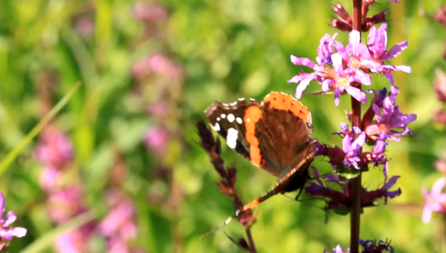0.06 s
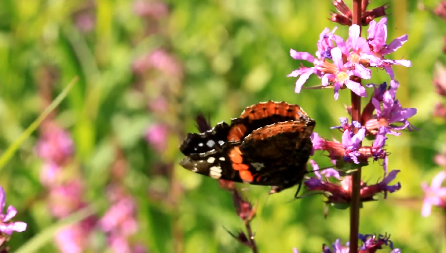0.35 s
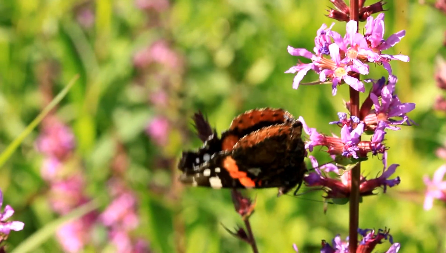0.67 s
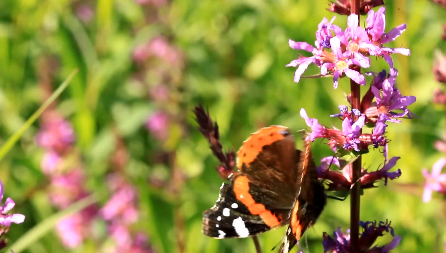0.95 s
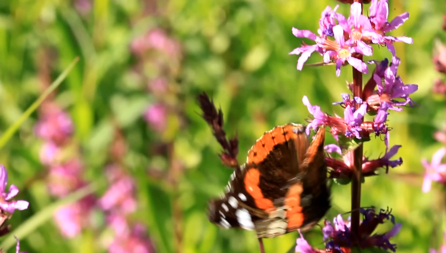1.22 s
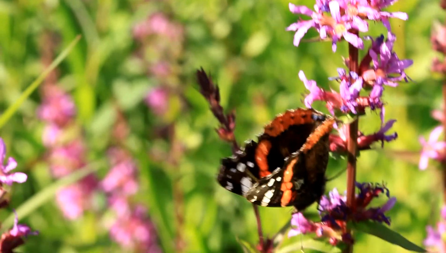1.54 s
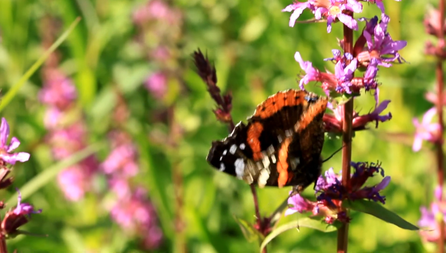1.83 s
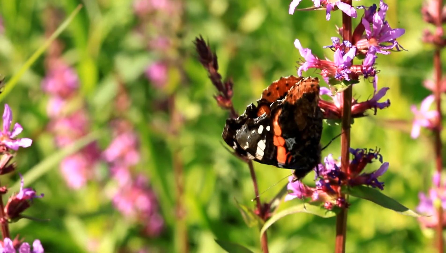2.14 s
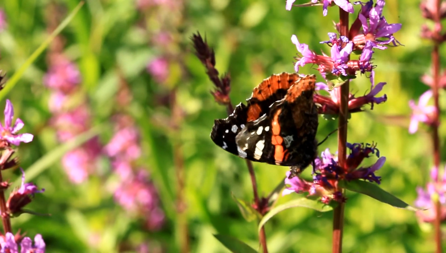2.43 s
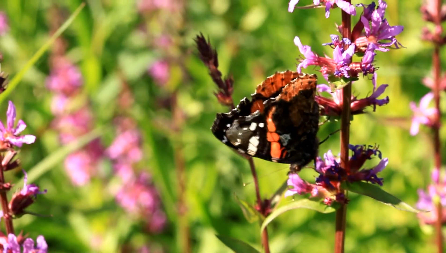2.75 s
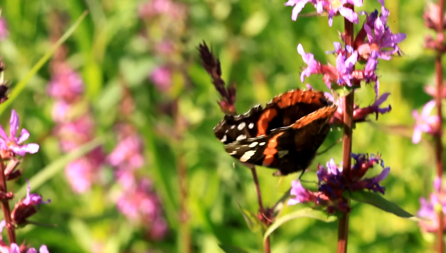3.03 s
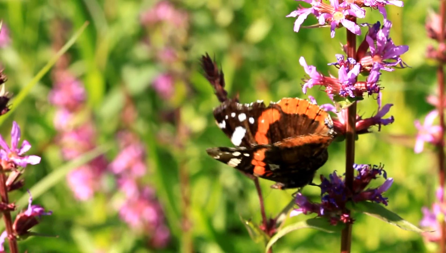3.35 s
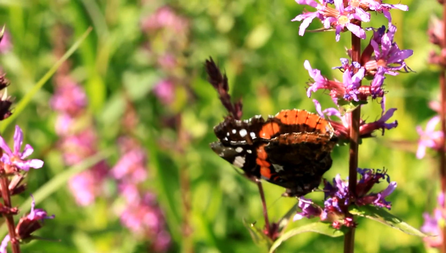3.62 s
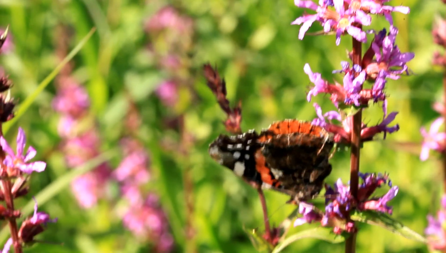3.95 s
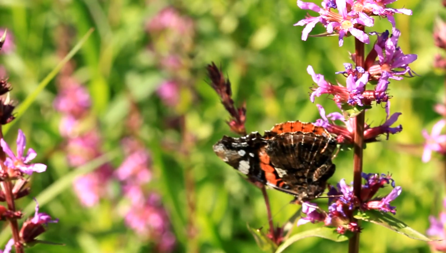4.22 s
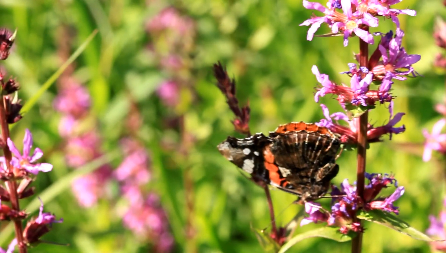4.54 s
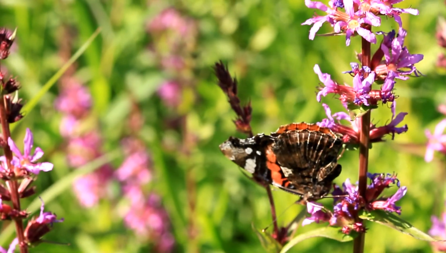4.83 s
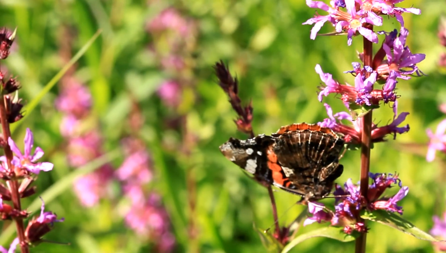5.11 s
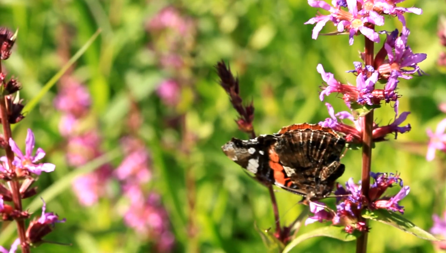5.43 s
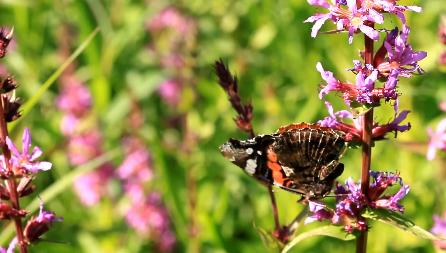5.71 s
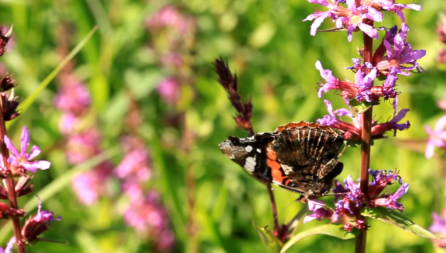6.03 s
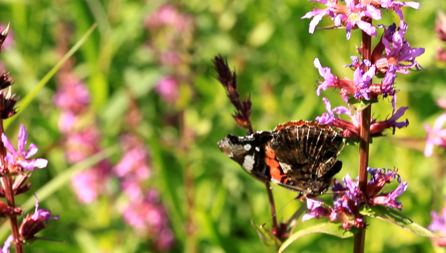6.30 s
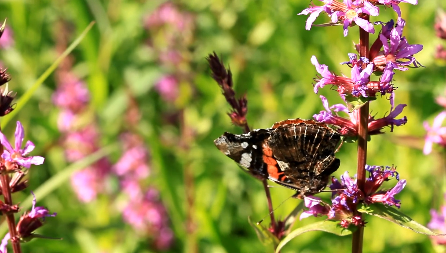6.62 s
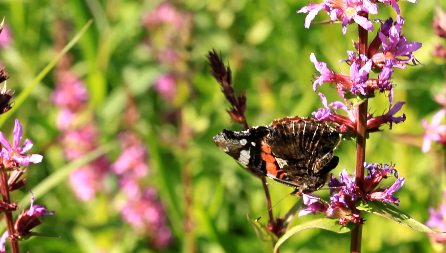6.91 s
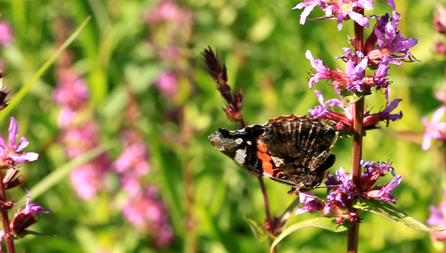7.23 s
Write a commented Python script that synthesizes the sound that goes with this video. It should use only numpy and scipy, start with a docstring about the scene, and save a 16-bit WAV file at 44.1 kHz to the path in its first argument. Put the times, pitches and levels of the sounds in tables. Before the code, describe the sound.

A small bird gives a short, high, rising whistle about once a second over the soft distant wash of a summer meadow and a very faint insect hum. Near the start, the camera body clicks sharply three times, right at the microphone, the third by far the loudest. A few soft far knocks and faint high ticks are scattered beneath, and from halfway on light wind rumbles on the microphone.

```python
"""Over the distant wash of a summer meadow and an insect's hum, a small bird repeats a rising whistle
about once a second: a nearly pure tone, reflected by the ground and scattered by plants and trees.
The camera that listens clicks sharply three times as its body is struck into resonance, the last so
loudly that its limiter ducks the meadow. Beneath are a few soft far knocks, faint ticks, one far
rising note and, from halfway on, light wind rumbling on the microphone."""
import sys
import numpy as np
from scipy import signal
from scipy.fft import rfft, irfft
from scipy.io import wavfile

SR = 44100
rng = np.random.default_rng(int(sys.argv[2]) if len(sys.argv) > 2 else 0)


def to_wav(sig):
    """Store sig (one row per channel, or 1-D mono) as 16-bit WAV at the path in sys.argv[1].

    Samples outside -1..1 are clipped; the rate is SR.
    """
    pcm = np.clip(np.atleast_2d(sig), -1, 1) * 32767
    pcm = np.round(pcm).astype(np.int16)
    wavfile.write(sys.argv[1], SR, pcm.T)  # frames by channels


N = 324576
TIME = np.arange(N) / SR

# Spectral densities of the distant wash and the even hiss: frequency_hz, relative_db
WASH_SPECTRUM = [(15, -43), (25, -12.5), (43, -6), (114, -9.5), (195, -3), (228, -3.5), (359, -1),
                 (589, -4.5), (676, -5), (746, -4.5), (856, -3.5), (1520, -4), (2800, -12.5), (3640, -25.5),
                 (6160, -120)]
HISS_SPECTRUM = [(1500, -30), (2500, -3), (3000, -0.5), (4300, 0), (6000, -2), (7500, -2), (8600, -8),
                 (10000, -12.5), (12000, -16.5), (15500, -21)]
# Slow drift of the wash: time_s, gain_db
WASH_DRIFT = [(0, -3), (.7, -1.88), (1.5, 0), (2.3, -1.78), (3.3, -0.54), (4.2, -1.5), (5.5, -0.88),
              (6.6, -0.93), (7.36, -1)]
# A moment in which the wash wavers and the hiss dips: time_s, wash_gain_db, hiss_gain_db
MEADOW_DIP = [(.803, 5.5, -0.5), (.812, 0.5, -15), (.826, -5.5, -12), (.836, -1, -8), (.855, 0.5, -3.5),
              (0.873, 3.5, 0)]
# Brief low swells of the wash: centre_s, length_s, frequency_hz, level_db
WASH_SWELLS = [(2.3, .7, 240, -59), (4.861, 0.285, 229.8, -51)]
# The bird's whistles: start_s, length_s, first_hz, drift_hz, hold_s, shoulder_hz, slur_at_s, slur_s,
# easing (1 = straight), top_hz, base_db, accent_db, accent_at_s, octave_db; "at" counts from start_s
BIRD_WHISTLES = [(0.081, 0.156, 3054, 10.5, 0.0507, 3413, 0.1105, .046, 1.8, 4745, -39.5, 4.33, 0.137, -61),
                 (1.004, 0.1672, 3039, 59.5, 0.045, 3465, .095, .060, 1.1, 4885, -39, 1.4, 0.13, -62),
                 (1.889, 0.1602, 2983, 200, 0.0466, 3430, 0.0999, 0.0617, 1.165, 4753, -39.5, 5.75, 0.1327, -53),
                 (2.826, 0.1674, 2990, 50, 0.042, 3390, 0.0968, 0.0662, 1.49, 4781, -39, 9, 0.1336, -52.5),
                 (3.760, 0.1644, 3027, 220, 0.0446, 3499, 0.0841, 0.0655, 1.07, 5234, -38, 5.75, 0.1126, -48.5),
                 (4.688, 0.1798, 2906, -71, .037, 3393, 0.1067, .054, 1.3, 4858, -40.5, 8.4, 0.134, -57),
                 (5.731, 0.166, 3004, 221, 0.0412, 3451, .099, .045, 0.9, 5215, -38, 7.24, 0.1355, -50.5),
                 (6.763, 0.1785, 2999, 87.5, 0.0371, 3323, 0.1007, 0.0692, 1.36, 4723, -41.5, 8.7, 0.1387, -58.5)]
# Scattering strength of the foliage: frequency_hz, gain_db
FOLIAGE_SCATTER = [(2000, -1.5), (3000, 0), (4200, 1), (4800, 2), (5250, -1.5), (10000, -7.5)]
# Soft far knocks: start_s, level_db, pitch_hz, t60_s
FAR_KNOCKS = [(.169, -32.5, 1740, 0.029), (2.1016, -30.5, 2124, 0.0165), (2.5575, -23.5, 550, 0.011),
              (2.5585, -38, 1608, .06), (4.605, -36, 1812, 0.039), (6.654, -37, 1738, 0.037),
              (7.05, -26.5, 1522, 0.029), (7.058, -38.5, 305, .15)]
# The camera's clicks: start_s, strike_db, gap_s, second_relative_db, snap_relative_db, push_db
CAMERA_CLICKS = [(0.5822, -12.5, 0.000826, 3.5, -9.5, -43), (0.9445, -12.5, 0.00081, -11, -5.5, -51),
                 (1.0653, -2, 0.00055, -10.5, -20.5, -28)]
# Normal modes of the camera body: frequency_hz, relative_db, t60_s
BODY_MODES = [(1123, -22.5, 0.0304), (1421.5, -15.5, 0.0318), (1984, -17.5, 0.0255), (2337, -21, 0.011),
              (3426, -15.5, 0.0059), (3938, -12, 0.0122), (5480, -8.5, 0.0099), (6120, -5, 0.0098),
              (6717, -7.5, 0.0199), (7273, -8.5, 0.01165), (8060, -6.5, 0.0092), (9700, -8, 0.00388),
              (11280, -17, 0.00464)]
# Spectrum of the snap that starts a click: frequency_hz, relative_db
SNAP_SPECTRUM = [(200, -22.5), (1500, -1), (4000, -5), (6500, -2), (8200, 5), (10000, -18.5), (12500, -13),
                 (16000, -33.5)]
# Faint high ticks: start_s, relative_db, centre_hz
HIGH_TICKS = [(0.7527, -43.5, 6150), (1.0246, -38, 6230), (1.507, -38, 6650), (2.1001, -39, 7100),
              (2.3431, -39.5, 6860), (2.5935, -37.5, 6250), (3.3812, -41.5, 5730), (4.3685, -42, 7450),
              (5.5528, -38, 6620), (7.2714, -41, 5500)]
# Spectral densities of the wind's rumble and a strong gust's flutter: frequency_hz, relative_db
RUMBLE_SPECTRUM = [(12, -24.5), (28, -3.5), (52, -7), (80, -4.5), (120, -12.5), (170, -21.5), (260, -34.5),
                   (600, -73)]
FLUTTER_SPECTRUM = [(40, -22), (100, -8.5), (140, 4.5), (190, -4), (300, -27), (700, -70)]
# Gusts on the microphone: peak_s, rise_and_fall_s, relative_db
WIND_GUSTS = [(4.365, 0.04, -43), (4.545, 0.037, -44), (5.115, 0.03, -49), (6.385, 0.032, -47),
              (6.505, 0.0375, -35.5), (7.23, 0.027, -49)]


def gain_of(db):
    """Amplitude ratio: tenfold for every 20 dB."""
    return 10 ** (np.asarray(db) / 20)


def unit_rms(x):
    """Normalisation to a mean power of 1."""
    return x / np.sqrt(np.mean(x ** 2) + 1e-20)


def add(mix, start_s, sound):
    """Superposition: a sound joins the mix at start_s."""
    part = mix[round(start_s * SR):][:len(sound)]
    part += sound[:len(part)]


def coloured(x, spectrum):
    """Zero-phase filtering by a curve of frequency_hz, gain_db."""
    hz, db = np.transpose(spectrum)
    curve_db = np.interp(np.log(np.fft.rfftfreq(len(x), 1 / SR) + 1), np.log(hz + 1), db)
    return irfft(rfft(x) * gain_of(curve_db), len(x))


def noise(spectrum, size):
    """Spectral shaping of white noise, scaled to rms 1."""
    return unit_rms(coloured(rng.standard_normal(size), spectrum))


def wander(rate_hz, size):
    """Low-passed noise: a smooth random fluctuation of rms 1, up to about rate_hz."""
    low_pass = np.exp(-(np.fft.rfftfreq(size, 1 / SR) / rate_hz) ** 2)
    low_pass[0] = 0
    return unit_rms(irfft(rfft(rng.standard_normal(size)) * low_pass, size))


def decay(t, t60_s):
    """Exponential damping: the amplitude falls 60 dB in t60_s."""
    return np.exp(-np.log(1000) * t / t60_s)


def meadow(wash_db=-49, hiss_db=-52.5, sway_db=0.5, flicker_db=1.0):
    """Amplitude-modulated noise: a low wash drifts and swells in narrow bands under an even hiss."""
    dip_s, wash_dip_db, hiss_dip_db = np.transpose(MEADOW_DIP)
    drift_db = np.interp(TIME, *np.transpose(WASH_DRIFT))
    drift_db += sway_db * wander(0.99, N) + flicker_db * wander(30.9, N)
    wash = noise(WASH_SPECTRUM, N) * gain_of(wash_db + drift_db + np.interp(TIME, dip_s, wash_dip_db))
    hiss = noise(HISS_SPECTRUM, N)
    hiss *= gain_of(hiss_db + 0.3 * wander(14.5, N) + np.interp(TIME, dip_s, hiss_dip_db))
    for centre_s, length_s, hz, db in WASH_SWELLS:
        band = [(hz / 2, -40), (hz * 0.855, -3), (hz, 0), (hz * 1.165, -4), (hz * 2, -50), (hz * 10, -90)]
        wash += gain_of(db) * noise(band, N) * np.exp(-(2 * (TIME - centre_s) / length_s) ** 2)
    return wash + hiss


def insect(wingbeat_hz=200, level_db=-64, waver=.04, swell_db=3):
    """Periodic wingbeats radiate a fundamental and its octave; pitch and level wander in flight."""
    phase = 2 * np.pi * np.cumsum(wingbeat_hz * (1 + waver * wander(4.06, N))) / SR
    hum = np.sin(phase) + gain_of(-0.5) * np.sin(2 * phase)
    return gain_of(level_db) * unit_rms(hum * gain_of(swell_db * wander(1.93, N)))


def whistle(length_s, first_hz, drift_hz, hold_s, shoulder_hz, slur_at_s, slur_s, easing, top_hz,
            base_db, accent_db, accent_at_s, octave_db,
            scoop_hz=109.7, scoop_s=0.0072, step_s=.028, shoulder_hz_per_s=7500, waver=0.00505,
            crescendo_db=8, step_dip_db=2, accent_s=0.02075, flutter_db=1.71,
            attack_s=0.0151, release_s=0.0075, octave_s=0.0453, thin_octave_db=-41):
    """Frequency modulation: a nearly pure tone scoops, holds, steps up, then slurs upward and swells."""
    t = np.arange(0, length_s, 1 / SR)
    held_hz = first_hz + drift_hz * np.minimum(t / hold_s, 1) - scoop_hz * np.exp(-t / scoop_s)
    rising_hz = shoulder_hz + shoulder_hz_per_s * np.maximum(np.minimum(t, slur_at_s) - hold_s - step_s, 0)
    step = np.clip((t - hold_s) / step_s, 0, 1)
    slur = 1 - np.clip(1 - (t - slur_at_s) / slur_s, 0, 1) ** easing
    pitch_hz = held_hz + step * (rising_hz - held_hz) + slur * (top_hz - rising_hz)
    phase = 2 * np.pi * np.cumsum(pitch_hz * (1 + waver * wander(123, len(t)))) / SR
    swell_db = crescendo_db * t / length_s + accent_db * np.exp(-((t - accent_at_s) / accent_s) ** 2)
    dip_db = step_dip_db * np.exp(-(2 * (t - hold_s) / step_s) ** 2)
    fundamental = gain_of(base_db + swell_db - dip_db + flutter_db * wander(162, len(t)))
    opening = np.exp(-(t / octave_s) ** 4)  # the tone turns pure once the throat is tuned to it
    octave = gain_of(octave_db) * opening + gain_of(thin_octave_db) * fundamental
    gate = np.minimum(t / attack_s, 1) * np.minimum((length_s - t) / release_s, 1)
    return np.sqrt(2) * gate * (fundamental * np.sin(phase) + octave * np.sin(2 * phase))


def foliage(x, near_db=-8.0, near_t60_s=0.175, far_db=-13, far_t60_s=0.387, echo_s=0.061, echo_db=-19):
    """Scattering: near stems add a short tail to the direct sound, far trees a long one; one echo."""
    t = np.arange(SR * 2 // 3) / SR
    response = np.zeros(len(t))
    for db, t60_s, onset_s in [(near_db, near_t60_s, .002), (far_db, far_t60_s, .018)]:
        tail = rng.standard_normal(len(t)) * decay(t, t60_s) * (1 - np.exp(-(t / onset_s) ** 2))
        response += gain_of(db) * tail / np.linalg.norm(tail)
    add(response, echo_s, gain_of([echo_db]))
    return signal.fftconvolve(x, signal.unit_impulse(len(t)) + coloured(response, FOLIAGE_SCATTER))


def bird(ground_delay_s=.00301, ground_db=-14):
    """Interference: the ground reflection, just behind the direct sound, ripples each slur."""
    song = np.zeros(N)
    for start_s, *shape in BIRD_WHISTLES:
        add(song, start_s, foliage(whistle(*shape)))  # bird and leaves move, so each scatters anew
    delay = np.exp(-2j * np.pi * np.fft.rfftfreq(N, 1 / SR) * ground_delay_s)
    return song + gain_of(ground_db) * irfft(rfft(song) * delay, N)


def knocks(rise_s=0.000405):
    """Damped resonance: one mode of each far knock arrives through the foliage."""
    out, t = np.zeros(N), np.arange(SR // 4) / SR
    for start_s, db, hz, t60_s in FAR_KNOCKS:
        envelope = decay(t, t60_s) * (1 - np.exp(-t / rise_s))
        add(out, start_s, gain_of(db) * np.sin(2 * np.pi * hz * t) * envelope)
    return foliage(out, far_db=-9)[:N]


def camera_clicks(snap_t60_s=0.0167, push_hz=105, push_t60_s=0.0434, thud_db=-29, thud_t60_s=0.0226):
    """Impact excitation: a double strike rings the plastic body's modes, with a thud and a low push."""
    out, t = np.zeros(N), np.arange(SR // 10) / SR
    ring = sum((-1) ** k * gain_of(db) * decay(t, t60_s) * np.sin(2 * np.pi * hz * t)
               for k, (hz, db, t60_s) in enumerate(BODY_MODES))
    push = np.cos(2 * np.pi * push_hz * t) * decay(t, push_t60_s)
    for start_s, db, gap_s, second_db, snap_db, push_db in CAMERA_CLICKS:
        for delay_s, strike_db in [(0, db), (gap_s, db + second_db)]:
            snap = gain_of(snap_db) * noise(SNAP_SPECTRUM, len(t)) * decay(t, snap_t60_s)
            add(out, start_s + delay_s, gain_of(strike_db) * (ring + snap))
        thud = noise([(100, -7.5), (300, -5.5), (1300, 4.5), (2000, -5.5), (3500, -33)], len(t))
        add(out, start_s, gain_of(push_db) * push + gain_of(db + thud_db) * thud * decay(t, thud_t60_s))
    return out


def ticks(gain_db=-1, t60_s=0.0191, rise_s=0.00037, stray_db=-49, stray_hz=6800, stray_count=22):
    """Narrow-band transients: quickly damped puffs of high noise, the fainter ones at random times."""
    out, t = np.zeros(N), np.arange(SR // 20) / SR
    envelope = decay(t, t60_s) * (1 - np.exp(-t / rise_s))
    strays = [(when * N / SR, stray_db + 4 * size, stray_hz * 2 ** ((pitch - .5) / 2))
              for when, size, pitch in rng.random((stray_count, 3))]
    for start_s, db, hz in list(HIGH_TICKS) + strays:
        band = [(hz * 0.396, -30), (hz * 0.987, -6), (hz, 0), (hz * 1.09, -7), (hz * 1.51, -32)]
        add(out, start_s, gain_of(db + gain_db) * noise(band, len(t)) * envelope)
    return out


def far_note(centre_s=2.325, length_s=.06, centre_hz=480, hz_per_s=3000, level_db=-45):
    """A linear chirp: one faint, short rising note, scattered on its way from afar."""
    out, t = np.zeros(N), np.arange(-length_s / 2, length_s / 2, 1 / SR)
    phase = 2 * np.pi * np.cumsum(centre_hz + hz_per_s * t) / SR
    tone = np.sqrt(2) * np.sin(phase) * signal.windows.hann(len(t))
    add(out, centre_s - length_s / 2, gain_of(level_db) * tone)
    return foliage(out)[:N]


def wind(rumble_gain_db=-2, breeze_from_s=3.53, breeze_rise_s=0.253, breeze_db=-60,
         unrest_db=3, unrest_hz=9, flutter_db=-50, flutter_exponent=1.4):
    """Turbulence: a breeze and gusts rumble on the microphone; stronger gusts reach higher in pitch."""
    onset = np.clip((TIME - breeze_from_s) / breeze_rise_s, 0, 1)
    breeze = onset * gain_of(breeze_db + unrest_db * wander(unrest_hz, N))
    gusts = sum(gain_of(db) * np.exp(-abs(TIME - peak_s) / width_s) for peak_s, width_s, db in WIND_GUSTS)
    rumble = noise(RUMBLE_SPECTRUM, N) * gain_of(rumble_gain_db) * np.hypot(breeze, gusts)
    flutter = noise(FLUTTER_SPECTRUM, N) * gain_of(flutter_db) * (gusts / gusts.max()) ** flutter_exponent
    return rumble + flutter


def scene():
    """Superposition: the pressures of all sources add at one microphone."""
    return (bird() + camera_clicks() + ticks() + knocks() + far_note() + meadow() + insect() + wind())[None]


def record(dry, limit_db=-3, max_duck_db=8.0, recover_s=0.207, attack_s=0.00078, cutoff_hz=15900):
    """Peak limiting: the gain drops fast and recovers slowly; saturation and a low-pass follow."""
    over_db = np.clip(20 * np.log10(abs(dry[0]) + 1e-9) - limit_db, 1e-6, max_duck_db)
    # each peak's excess is held and dies away exponentially
    held_db = np.exp(np.maximum.accumulate(np.log(over_db) + TIME / recover_s) - TIME / recover_s)
    lag = np.exp(-1 / (attack_s * SR))
    duck_db = signal.lfilter([1 - lag], [1, -lag], held_db)
    ducked = np.clip(dry * gain_of(-duck_db), -1, 1)
    low_pass = signal.firwin(511, cutoff_hz, window=("kaiser", 9), fs=SR)
    return signal.oaconvolve(ducked, low_pass[None], "same")


dry = scene()
out = record(dry)
to_wav(out)
```